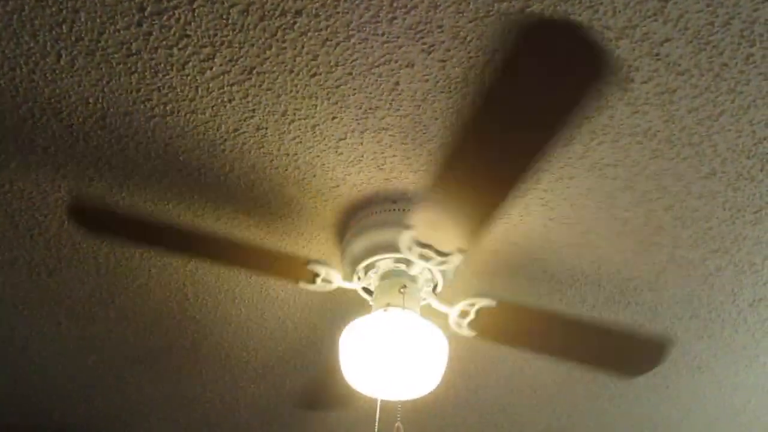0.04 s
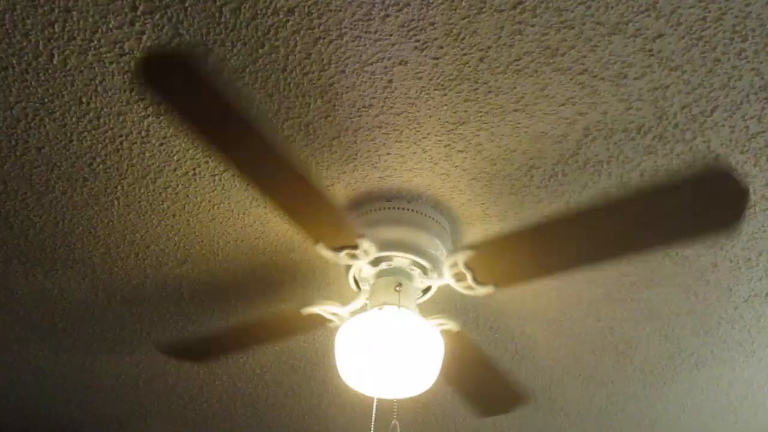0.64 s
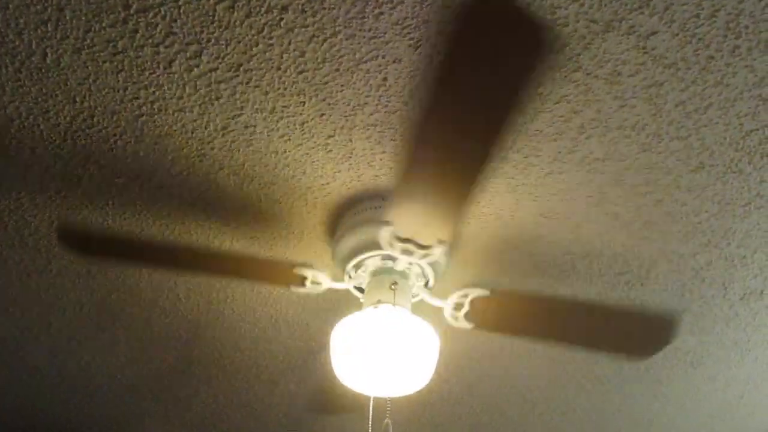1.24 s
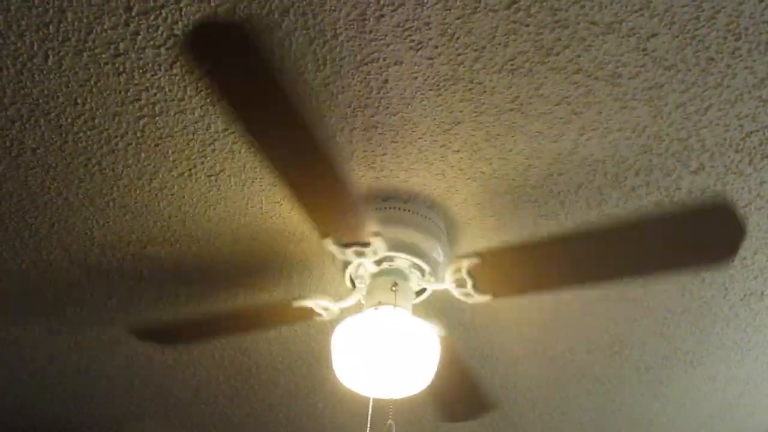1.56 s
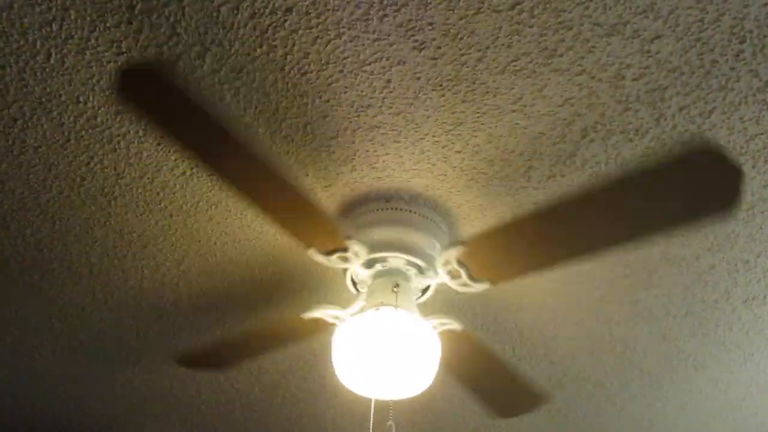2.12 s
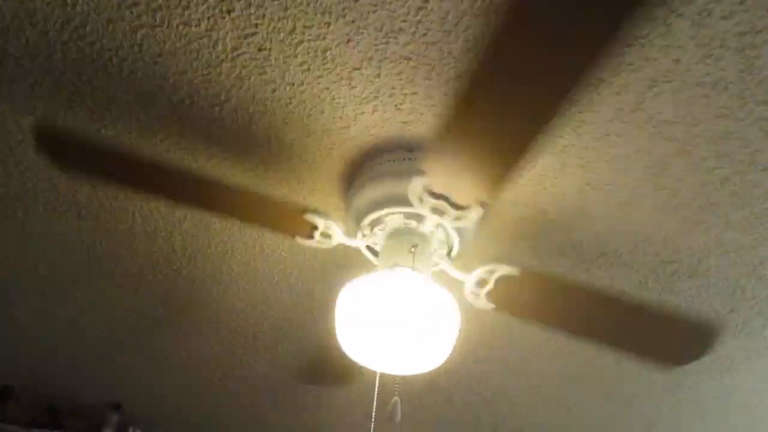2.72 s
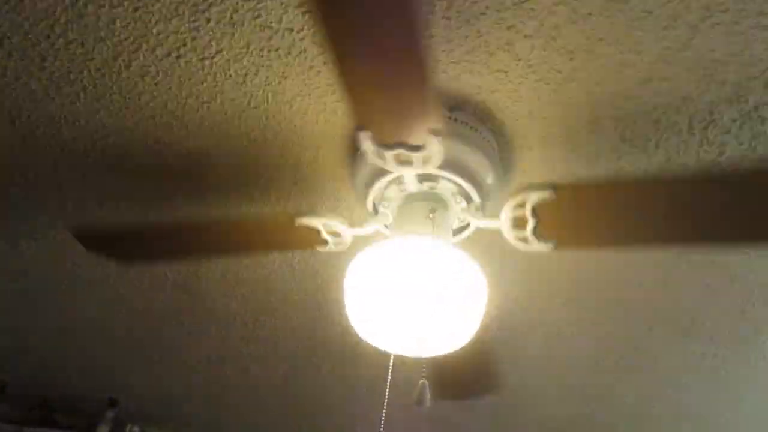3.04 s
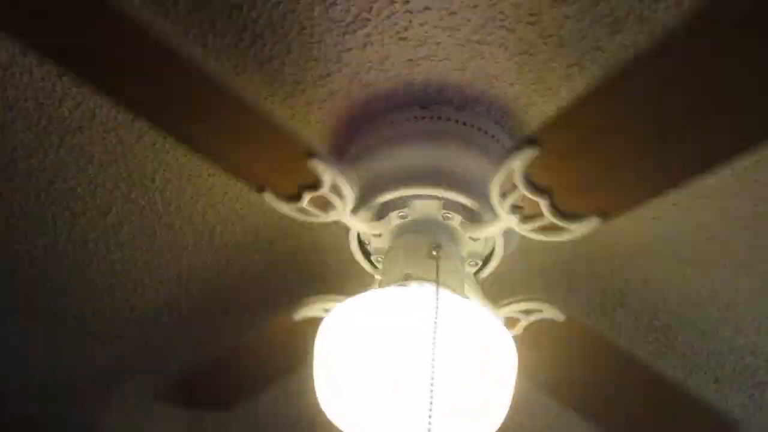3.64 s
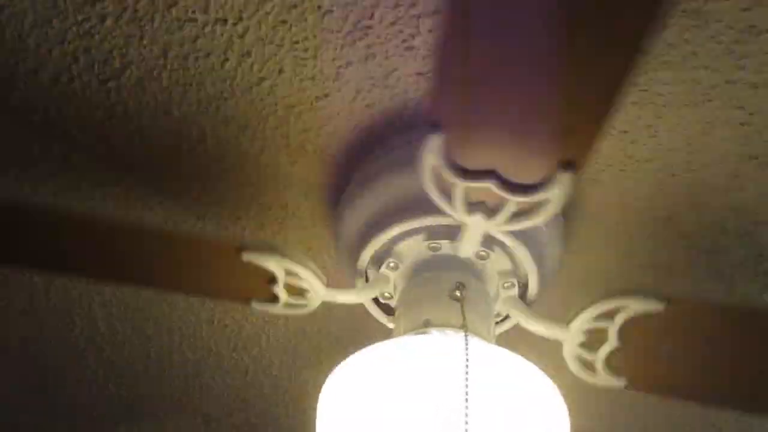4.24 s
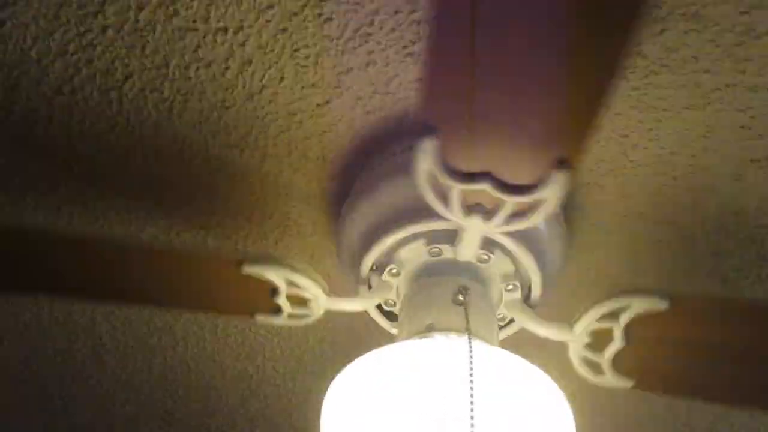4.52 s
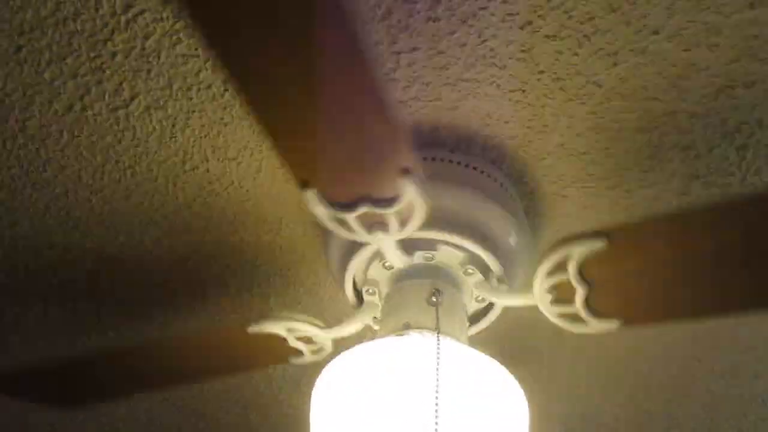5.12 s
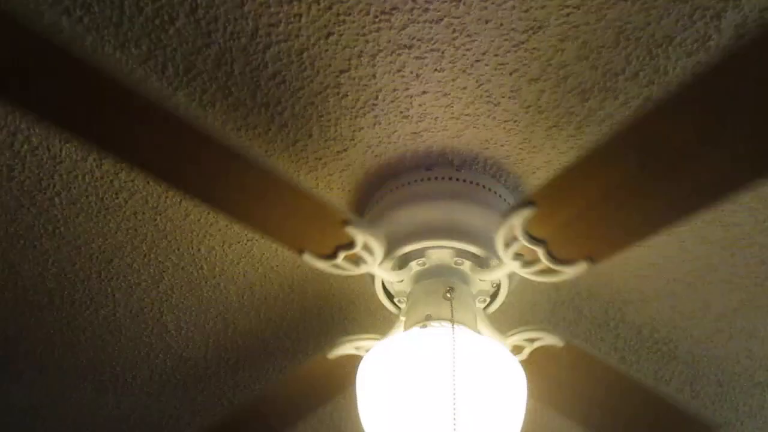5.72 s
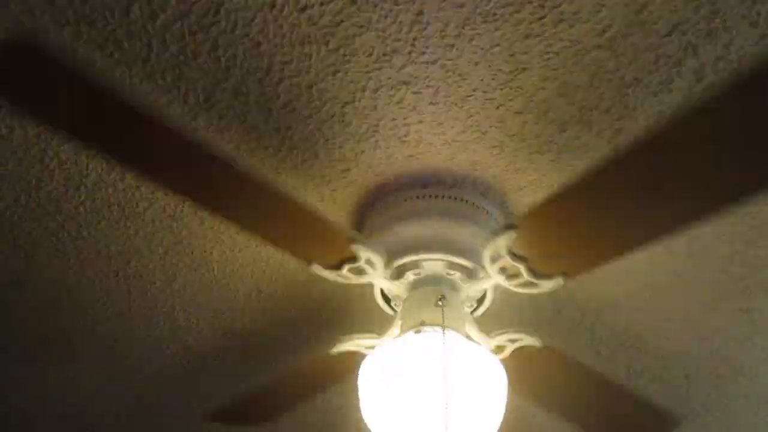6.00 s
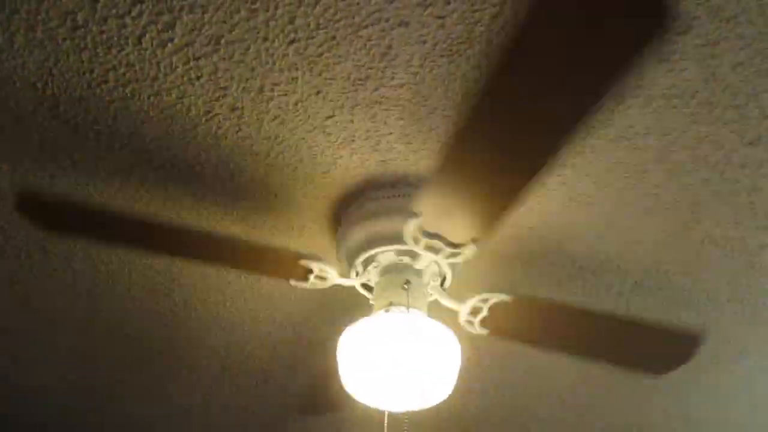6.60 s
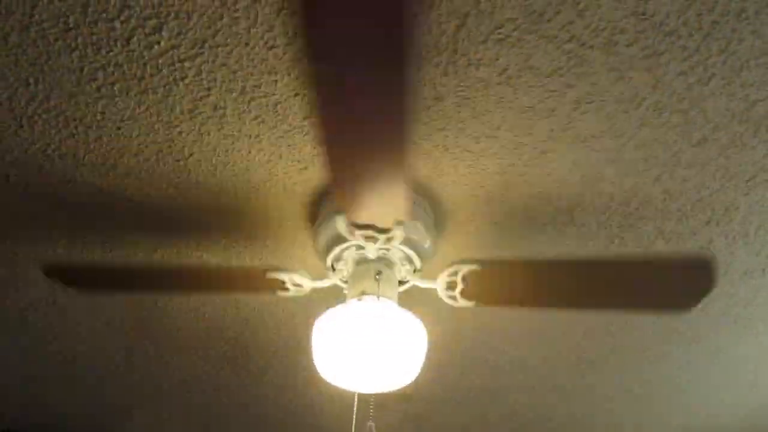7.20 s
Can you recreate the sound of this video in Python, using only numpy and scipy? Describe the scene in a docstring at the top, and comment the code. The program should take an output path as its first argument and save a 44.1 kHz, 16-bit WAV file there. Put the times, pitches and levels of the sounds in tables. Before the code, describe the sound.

Steady low motor hum of a ceiling fan in a quiet room, with a few faint ticks and a short, puffing wind rumble.

```python
"""A ceiling fan turns in a quiet room: its motor hums at twice the mains frequency and swells with each
passing blade, over a soft wash of air and the microphone's hiss. A few faint ticks sound around 2 s.
The microphone moves in: two weak rotor tones come out, and from about 3.7 to 5 s the downdraught
rumbles and puffs on it. It draws back with a few more ticks and, near 6.4 s, one handling click."""
import sys
import numpy as np
from scipy.fft import rfft, irfft, next_fast_len
from scipy.io import wavfile
from scipy.ndimage import map_coordinates

SR = 44100
rng = np.random.default_rng(int(sys.argv[2]) if len(sys.argv) > 2 else 0)


def unload_wav(signal):
    """Save mono or channel-first audio to the path in sys.argv[1] as 16-bit WAV at rate SR, clipped to [-1, 1]."""
    wavfile.write(
        sys.argv[1],
        SR,
        np.round(np.clip(np.atleast_2d(signal).T, -1, 1) * 32767).astype(np.int16),
    )


N = 324576

HUM_HZ, FIRST_PASS_S = 120.07, .5
# overtones of the hum: multiple, level/dB, close boost/dB, close swell/dB,
# far lead/blade passes, close lead/blade passes
HUM_OVERTONES = [(2, -58.5, 1.5, 5.5, .47, -.05), (3, -76, 0, 1, 0, 0), (4, -81, 0, 1, 0, 0),
                 (5, -84, 5, 2, 0, 0), (6, -82.5, 9, 6.5, .14, .14)]
# the fan slows a little: t/s, blade passes/Hz
PASS_RATE = [(0, 1.886), (3.2, 1.866), (5, 1.794), (7.36, 1.723)]
# the upper rotor tone sags: t/s, f/Hz
ROTOR_PITCH = [(0, 210), (2.5, 209), (4.7, 206.2), (7.36, 206)]
# rotor tones: ratio to the upper tone, close level/dB
ROTOR_PARTIALS = [(1, -51.5), (6 / 7, -58)]
# the microphone's move toward the motor and back: t/s, nearness (0-1)
MIC_NEARNESS = [(0, 0.09), (2.2, 0.1), (2.7, 0.51), (3.2, 0.69), (3.7, 0.95), (4.7, 0.94), (5.3, 0.9),
                (6, 0.65), (6.5, 0.26), (7.36, 0.28)]
# eddies that hit the microphone: t/s, envelope peak level/dB, f/Hz
EDDY_PUFFS = [(3.3, -41, 45), (3.76, -24, 57.7), (3.812, -17.5, 87), (3.848, -21.5, 49.6),
              (4.356, -23.5, 42), (4.3991, -10.5, 151.5), (4.462, -27, 95), (4.616, -29, 45.3),
              (4.786, -18.5, 49), (4.96, -31, 35)]
# spectrum of the moving room air: f/Hz, relative level/dB
AIR_SPECTRUM = [(12, -8), (25, -0.5), (60, -1), (130, 0), (190, -7.5), (260, -8), (330, -12.5), (450, -15),
                (600, -20), (820, -24), (1300, -26), (3000, -39)]
# resonances that colour the air: f/Hz, width/Hz, level/dB
AIR_RESONANCES = [(972, 134, -69), (3160, 150, -84.5), (7034, 190, -75.5), (11300, 410, -85.5)]
# ringing bands of the handling click: f/Hz, level/dB, t60/s
CLICK_RING = [(396, -47, 0.13), (1700, -53.5, 0.11), (6600, -47.5, 0.071)]
# faint ticks: t/s, level/dB, centre f/Hz
FAINT_TICKS = [(1.7322, -47.5, 1980), (1.8073, -54, 1900), (2.3508, -63, 1700), (5.0188, -54, 1500),
               (5.8403, -52.5, 3900), (6.235, -49.5, 4400)]
# spectrum of the microphone's hiss: f/Hz, relative level/dB
HISS_SPECTRUM = [(300, -5), (1200, -3), (2000, -0.5), (2900, -5), (3700, -5), (5800, -6), (7500, -5.5),
                 (11000, -9), (15700, -15.5)]
# thin electronic whistles: f/Hz, level/dB
MIC_WHISTLES = [(7852, -92), (7882, -93)]


def motor(near, far_swell_share=0.32, waver_db=1.26, drift_hz=.3):
    """Hum, overtones and rotor tones pulse with the blades; up close the overtones swell deeper."""
    passes = blade_passes()
    out = hum(near, passes)
    depth = far_swell_share + (1 - far_swell_share) * near
    for multiple, db, close_db, swell_db, far_lead, close_lead in HUM_OVERTONES:
        lead = far_lead + (close_lead - far_lead) * near
        blades_db = swell_db * depth * swell(passes, lead)
        level_db = db + close_db * near ** 2 + blades_db + waver_db * wobble(11)
        out += amp(level_db) * tone(multiple * HUM_HZ + drift_hz * wobble(6))
    return out + rotor(near, passes, waver_db)


def hum(near, passes, level_db=-31.0, close_db=-1.5, swell_db=0.91, shoulder_db=0.43, waver_db=0.25):
    """The stator holds one pitch; each blade reflects it into a swell, with a small shoulder between."""
    blades_db = swell_db * swell(passes, lead=0) + shoulder_db * swell(2 * passes, lead=0.16)
    return amp(level_db + close_db * near + blades_db + waver_db * wobble(9)) * tone(HUM_HZ)


def rotor(near, passes, waver_db, far_db=-17, swell_db=3.5):
    """Two weak rotor tones sag in pitch, throb with the blades and carry only a short way."""
    blades_db = swell_db * swell(passes, lead=0.11)
    out = np.zeros(N)
    for ratio, db in ROTOR_PARTIALS:
        level_db = db + far_db * (1 - near) + blades_db + waver_db * wobble(5.6)
        out += amp(level_db) * tone(ratio * curve(ROTOR_PITCH))
    return out


def blade_passes():
    """The running count of blades gone by, zero at the first pass."""
    count = np.cumsum(curve(PASS_RATE)) / SR
    return count - np.interp(FIRST_PASS_S, clock(), count)


def swell(passes, lead):
    """A swing of +-1 per blade, cresting lead passes before the blade goes by."""
    return np.cos(2 * np.pi * (passes + lead))


def eddies(edge=2.25, half_length_cycles=0.76, typical_hz=50):
    """Each eddy puffs: one short push and pull of pressure. The small, high ones last fewer cycles."""
    out = np.zeros(N)
    for s, db, hz in EDDY_PUFFS:
        cycles = (clock() - s) * hz
        length = half_length_cycles * np.sqrt(typical_hz / hz)
        bell = np.exp(edge * (1 - np.hypot(1, cycles / length)))  # round top, exponential skirts
        out -= amp(db) * np.sin(2 * np.pi * cycles) * bell
    return out


def downdraught(near, start_s=3.7, end_s=5.0, fade_s=0.06, close_db=-48, far_db=-26, inside_db=8,
                wake_db=-20.0, wake_s=0.033, lump_db=2.5):
    """Wind rumble on the microphone: more when near, most under the blades, flaring around each eddy."""
    t = clock()
    rumble = noise([(10, -19), (25, 10.5), (50, 2.5), (90, 3.0), (150, -8.0), (250, -24.5),
                    (400, -29.5), (900, -56.5), (3000, -120)])
    lumpy_rumble = unit(amp(lump_db * wobble(14)) * rumble)
    inside = np.interp(t, [start_s - fade_s, start_s, end_s, end_s + fade_s], [0, 1, 1, 0])
    flow = amp(close_db + far_db * (1 - near) + inside_db * inside)
    flurries = sum(amp(db + wake_db) * np.exp(-np.abs(t - s) / wake_s) for s, db, _ in EDDY_PUFFS)
    return (flow + flurries) * lumpy_rumble


def handling_click(start_s=6.362, attack_s=.004):
    """One fuller click rings in three bands at once, the lowest longest."""
    rise = np.clip((clock() - start_s) / attack_s, 0, 1)
    return rise * sum(burst(start_s, db, hz, t60, breadth=0.63) for hz, db, t60 in CLICK_RING)


def ticks():
    """Each faint tick is one dry burst."""
    return sum(burst(s, db, hz, t60=0.023, breadth=1.05) for s, db, hz in FAINT_TICKS)


def air(level_db=-52, sway_db=0.83, band_sway_db=1.5):
    """The blades stir a soft, low bed of air, with a few narrow resonances above it."""
    out = amp(level_db + sway_db * wobble(7.7)) * noise(AIR_SPECTRUM)
    for hz, width_hz, db in AIR_RESONANCES:
        out += amp(db + band_sway_db * wobble(4.6)) * noise_band(hz, width_hz)
    return out


def burst(start_s, db, hz, t60, breadth):
    """A band of noise, breadth * hz wide, with a hard attack and a fall of 60 dB in t60 seconds."""
    age = clock() - start_s
    return (age >= 0) * amp(db - 60 * np.abs(age) / t60) * noise_band(hz, breadth * hz)


def tone(hz):
    """A sine of rms 1 on a steady or moving pitch."""
    return np.sqrt(2) * np.sin(2 * np.pi * (np.cumsum(hz * np.ones(N)) / SR + rng.random()))


def noise(points):
    """Noise of rms 1, shaped by (f/Hz, relative level/dB) points."""
    f, db = np.transpose(points)
    spectrum = lambda hz: amp(np.interp(np.log(hz + 1), np.log(f), db))
    return unit(filtered(rng.standard_normal(N), spectrum))


def noise_band(hz, width_hz):
    """Noise of rms 1, run twice through one resonance."""
    mode = resonance(hz, width_hz)
    return unit(filtered(rng.standard_normal(N), lambda f: mode(f) ** 2))


def resonance(centre_hz, width_hz):
    """The response of one damped mode."""
    return lambda f: 1j * f * width_hz / (centre_hz ** 2 - f ** 2 + 1j * f * width_hz)


def filtered(x, response):
    """x through a frequency response."""
    size = next_fast_len(N + SR // 2)
    return irfft(rfft(x, size) * response(np.fft.rfftfreq(size, 1 / SR)), size)[:N]


def wobble(rate):
    """A smooth random curve, rate knots a second."""
    knots = rng.standard_normal(int(N * rate / SR) + 4)
    return map_coordinates(knots, [np.arange(N) * rate / SR])


def curve(rows):
    """(t/s, value) breakpoints as one value per sample."""
    return np.interp(clock(), *np.transpose(rows))


def clock():
    """Every sample's time in seconds."""
    return np.arange(N) / SR


def amp(db):
    """Decibels to gain."""
    return 10 ** (np.asarray(db) / 20)


def unit(x):
    """x at rms 1."""
    return x / np.sqrt(np.mean(x ** 2) + 1e-20)


def scene():
    """The mono mix of motor, moving air, ticks and click at one moving microphone."""
    near = curve(MIC_NEARNESS)
    return (motor(near) + air() + downdraught(near) + eddies() + ticks() + handling_click())[None]


def record(dry, hiss_db=-60, notch_hz=4800, notch_width_hz=900, notch_depth=0.56,
           roll_hz=14700, top_hz=15720):
    """The microphone adds hiss and faint whistles; it has one deep notch, a soft top and a band limit."""
    hiss = amp(hiss_db) * noise(HISS_SPECTRUM)
    whistles = sum(amp(db) * tone(hz) for hz, db in MIC_WHISTLES)
    notch = resonance(notch_hz, notch_width_hz)
    response = lambda hz: (1 - notch_depth * notch(hz)) ** 2 / (1 + (hz / roll_hz) ** 4) * (hz < top_hz)
    return filtered(dry[0] + hiss + whistles, response)[None]


dry = scene()
out = record(dry)
unload_wav(out)
```